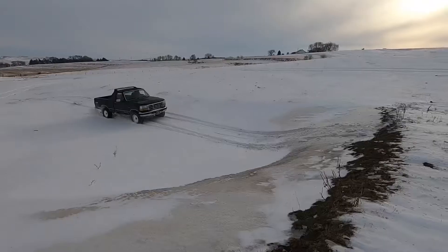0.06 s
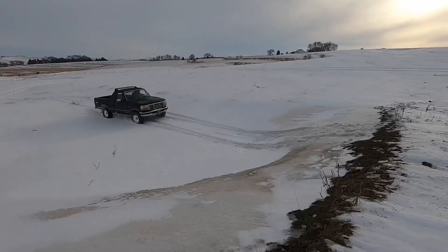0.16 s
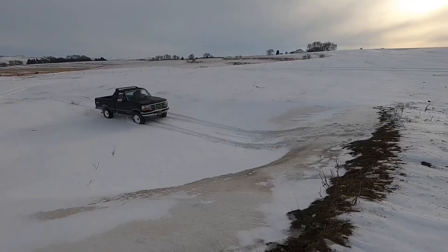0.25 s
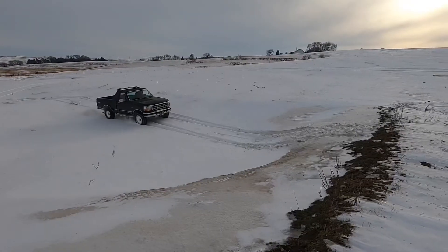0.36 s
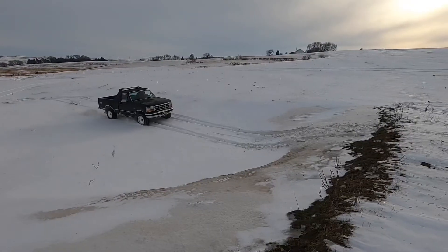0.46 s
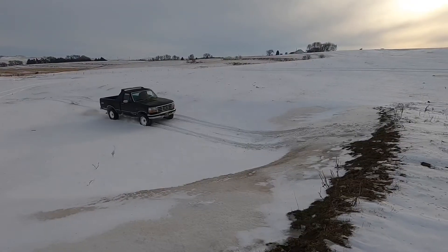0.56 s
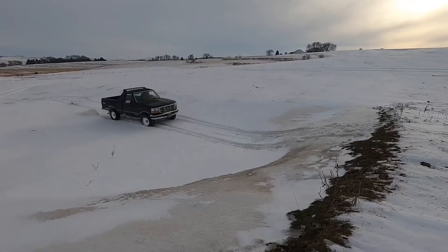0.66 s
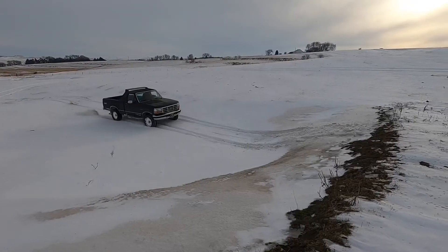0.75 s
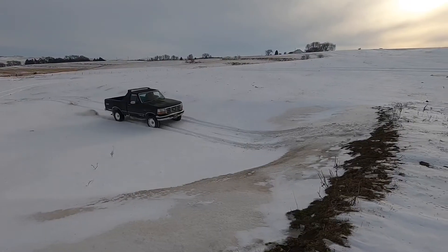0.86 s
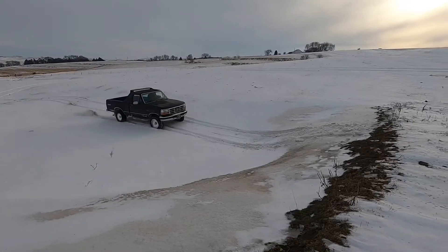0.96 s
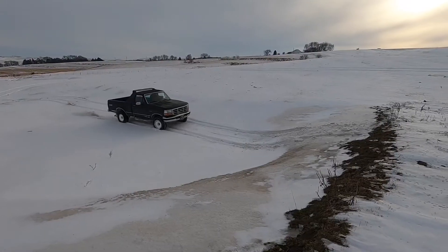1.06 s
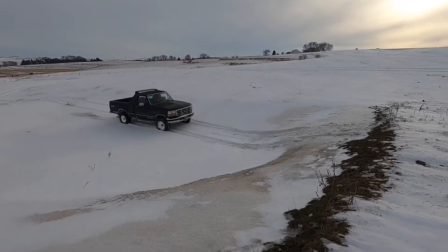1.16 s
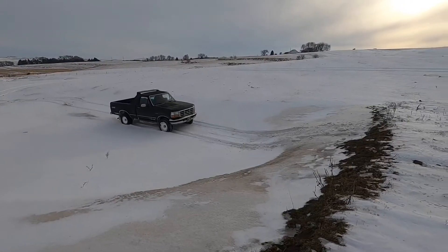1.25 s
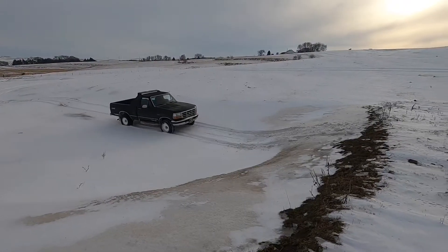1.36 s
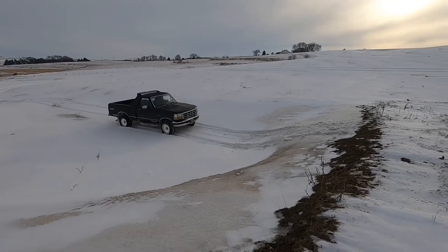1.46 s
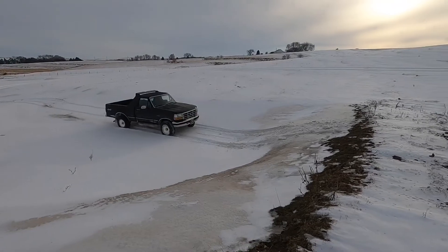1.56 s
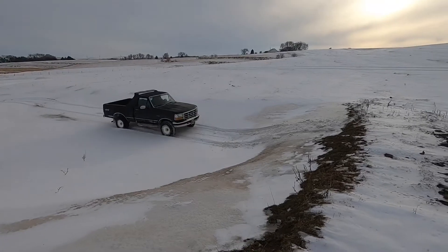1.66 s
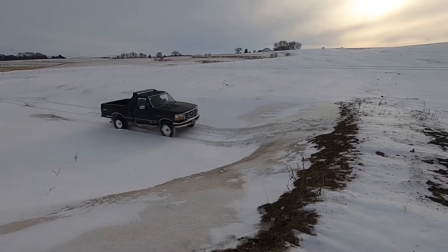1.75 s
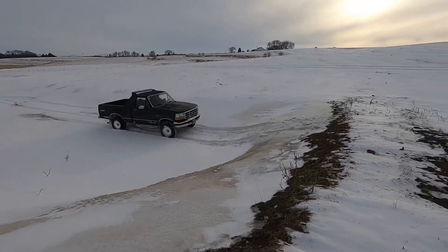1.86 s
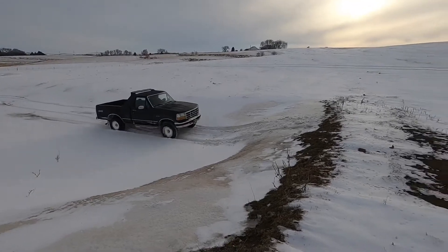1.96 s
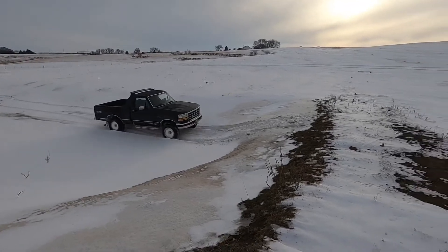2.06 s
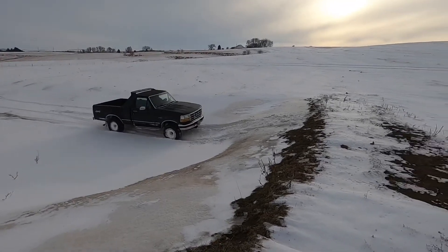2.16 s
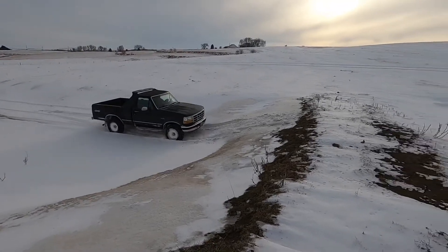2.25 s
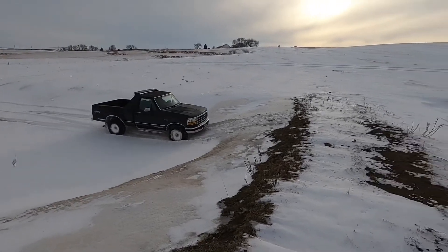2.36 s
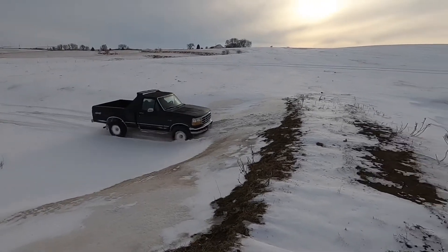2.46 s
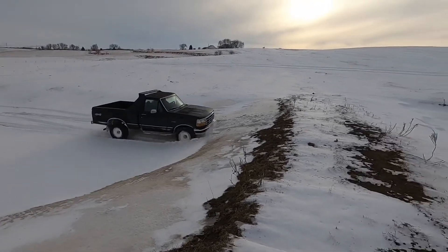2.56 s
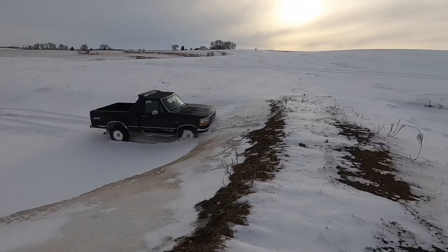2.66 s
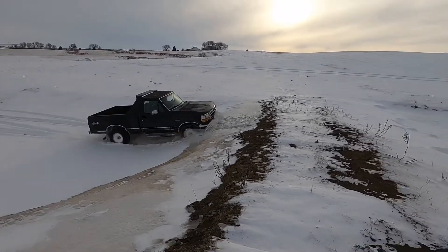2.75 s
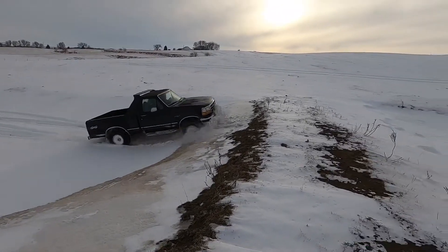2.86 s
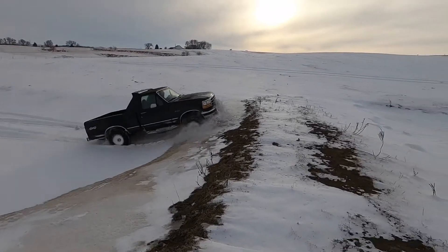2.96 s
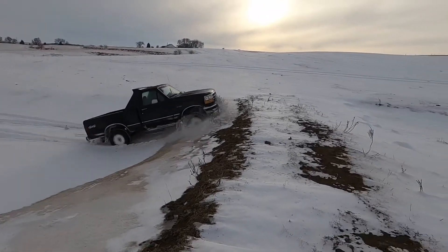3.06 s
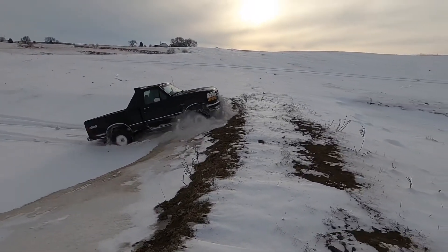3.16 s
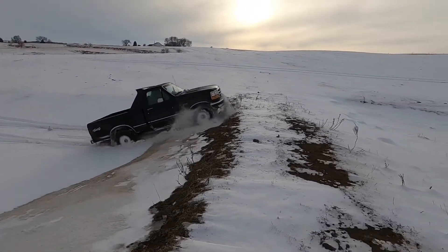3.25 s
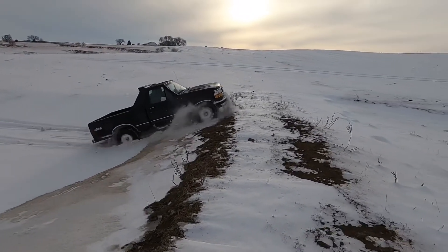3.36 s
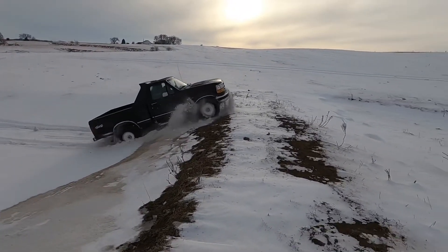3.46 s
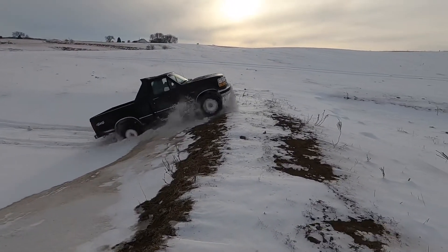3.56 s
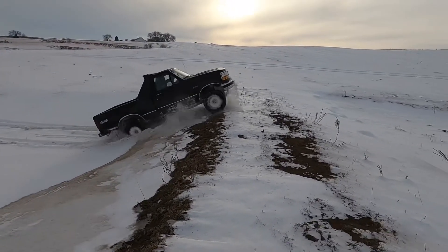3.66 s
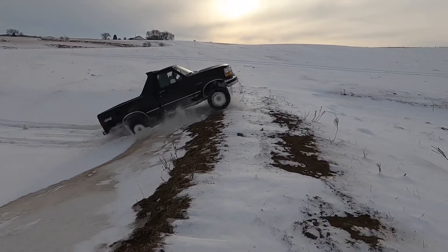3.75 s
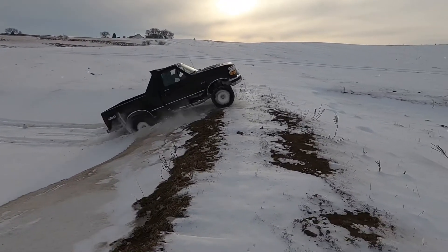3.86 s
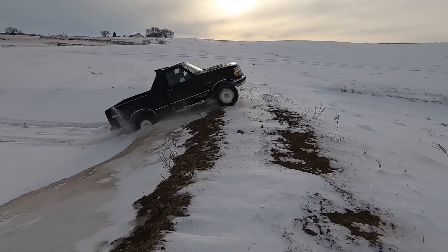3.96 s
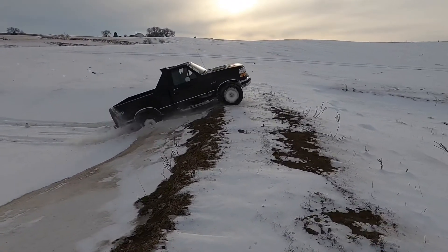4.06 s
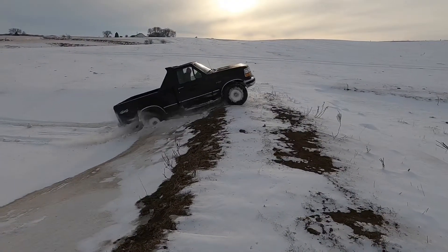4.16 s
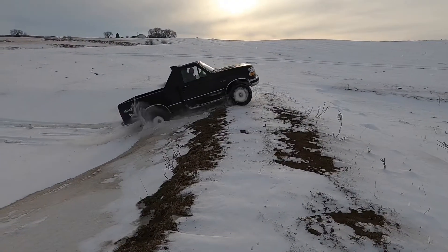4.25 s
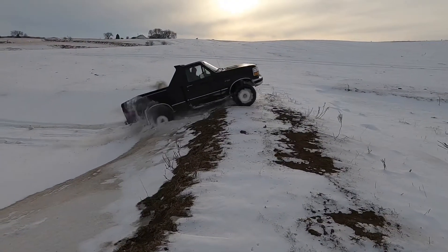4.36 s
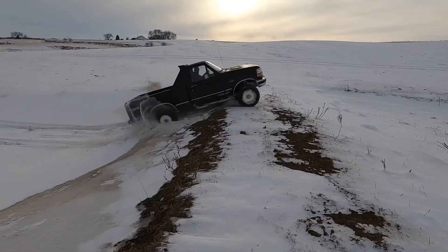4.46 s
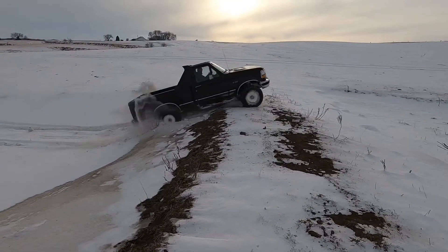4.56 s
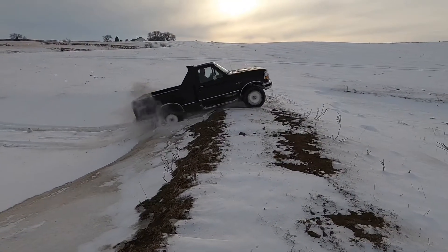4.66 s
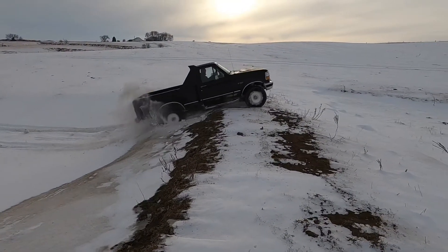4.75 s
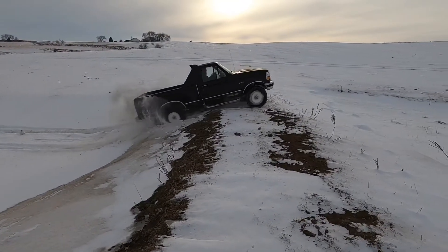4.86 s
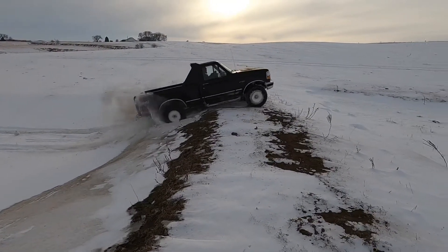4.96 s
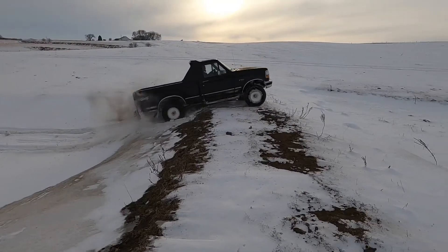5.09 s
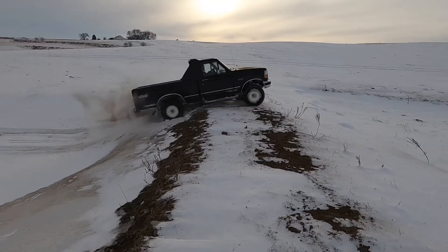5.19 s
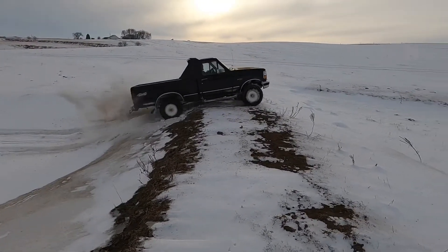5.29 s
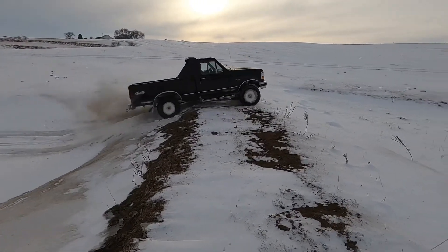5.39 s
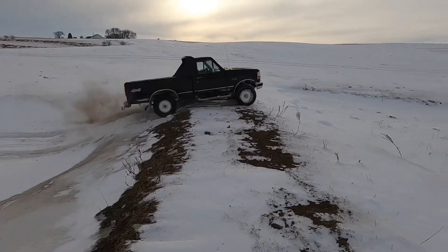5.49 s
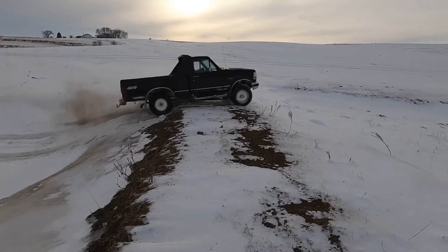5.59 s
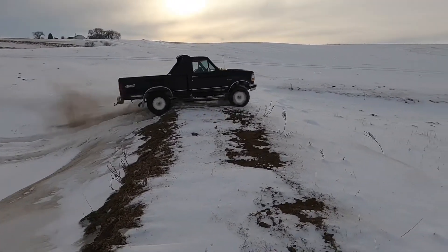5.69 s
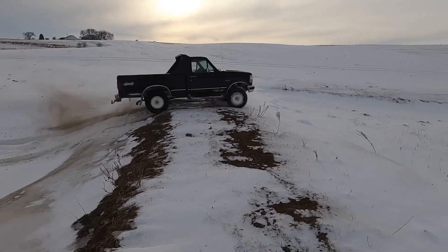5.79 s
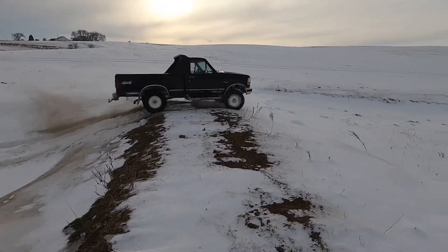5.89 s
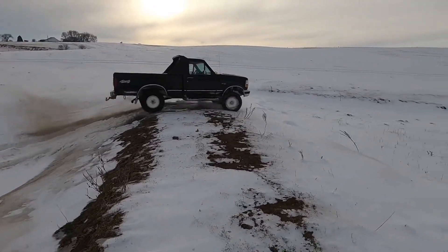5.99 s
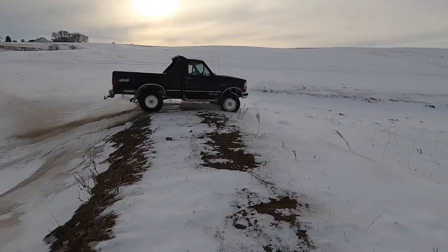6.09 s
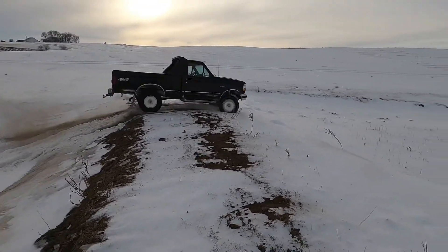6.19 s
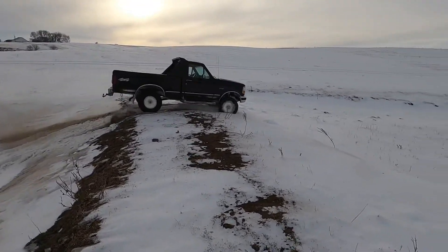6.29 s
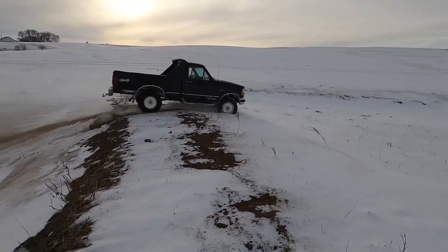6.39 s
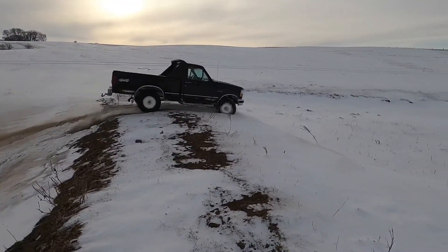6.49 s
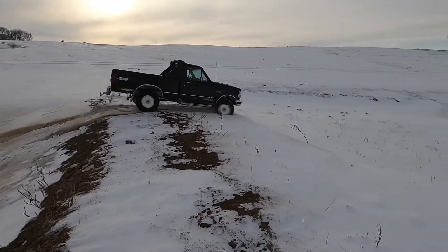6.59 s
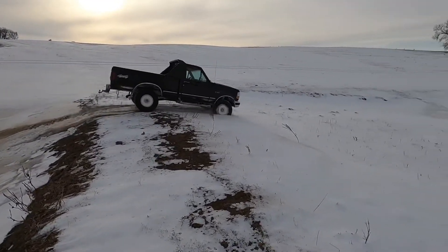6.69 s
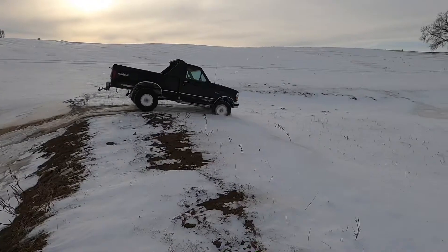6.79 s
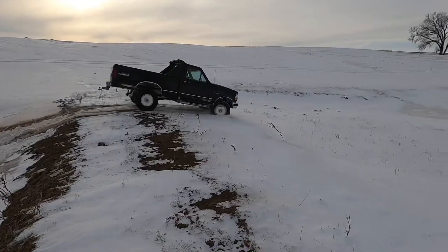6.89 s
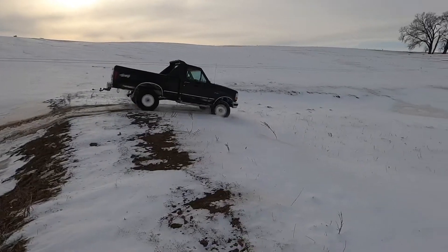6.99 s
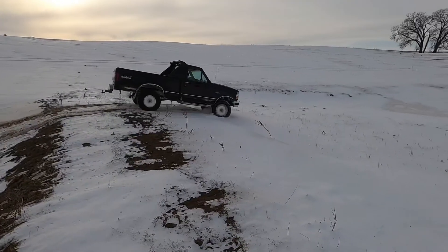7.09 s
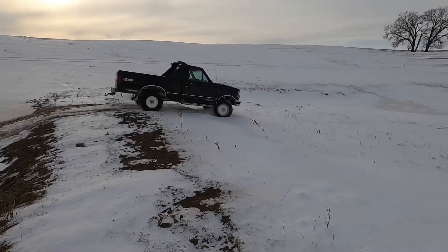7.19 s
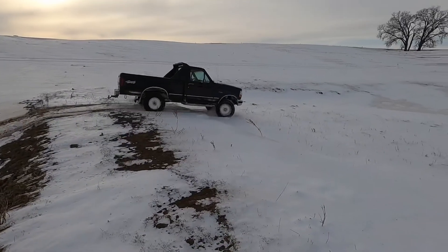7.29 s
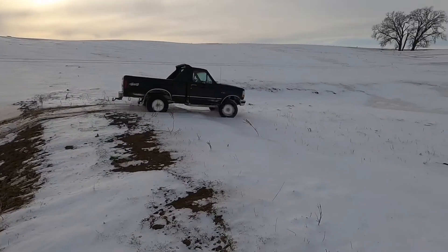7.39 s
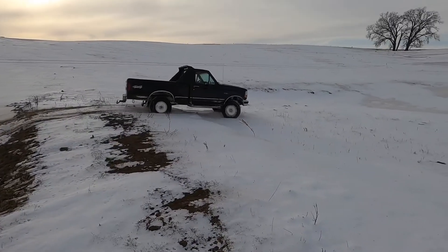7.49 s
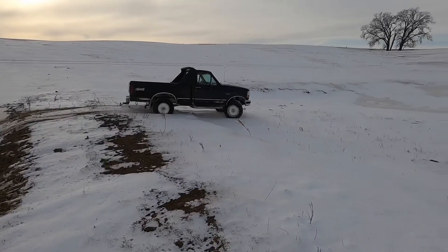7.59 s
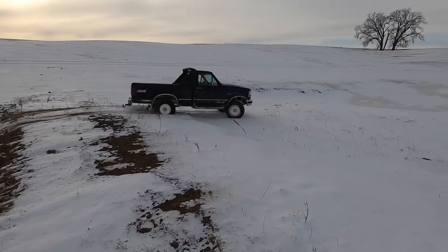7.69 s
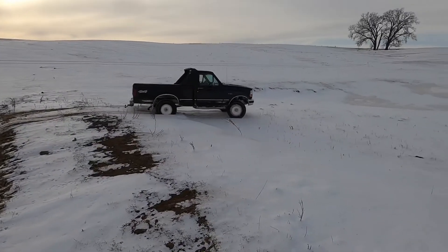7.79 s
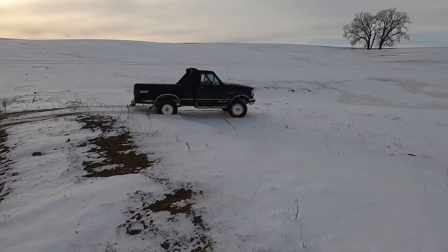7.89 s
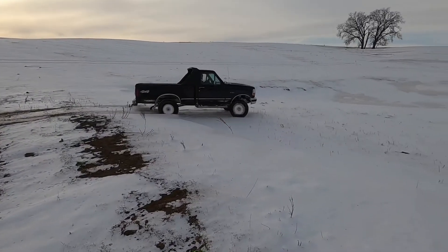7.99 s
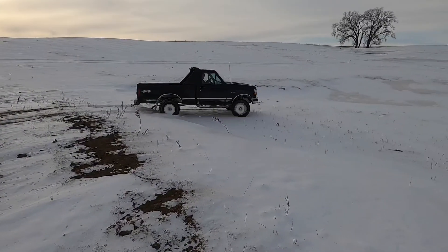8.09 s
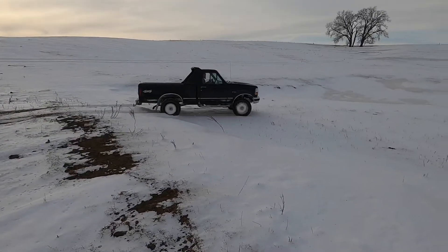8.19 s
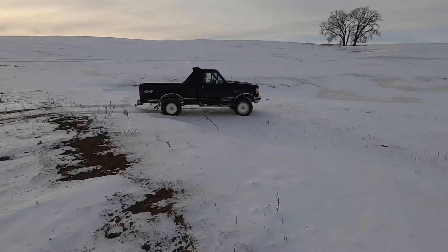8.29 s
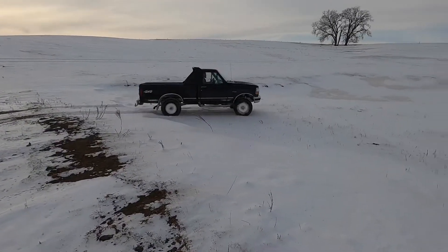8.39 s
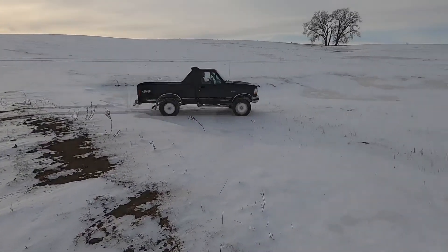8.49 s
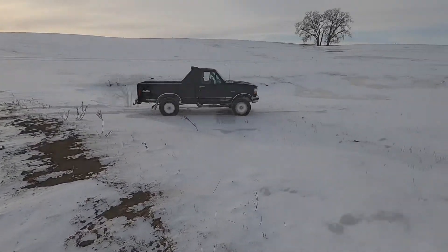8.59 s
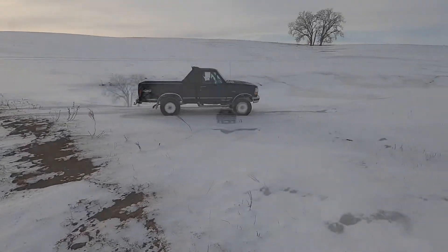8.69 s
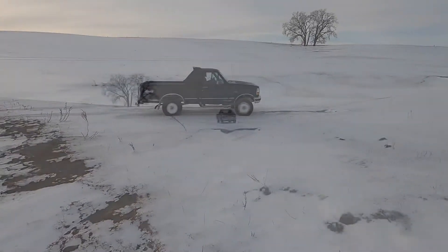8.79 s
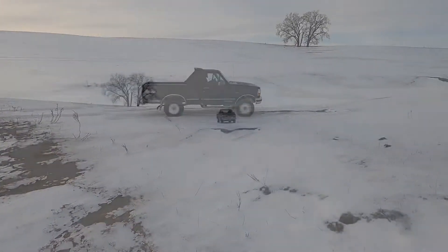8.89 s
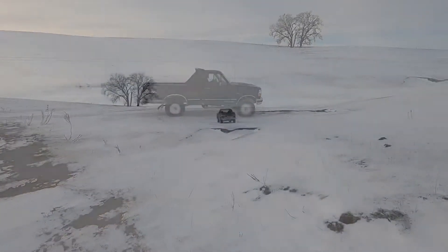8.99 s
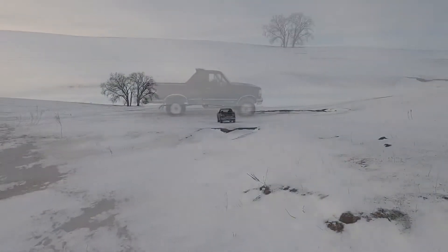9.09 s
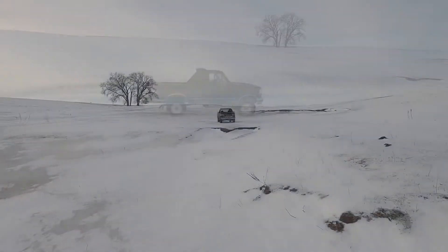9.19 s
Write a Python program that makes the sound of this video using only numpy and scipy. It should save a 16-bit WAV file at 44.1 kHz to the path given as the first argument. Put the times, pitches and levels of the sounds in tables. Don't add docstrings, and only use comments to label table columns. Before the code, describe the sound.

Outdoors on open snow, one nearly mono microphone hears a six-cylinder pickup already revving, its low exhaust hum barking under engine clatter, tyre churn, faint gear whine and light wind rumble. Small steel rattles tick at 0.1 to 0.4 seconds and around 1.1. Revs sag until 1.5, then surge with a jolt at 1.85. Near 2.7 to 3.3 the engine bogs and recovers as the truck lurches: thumps, sharp body clunks, bright rattles and rough wind-like shaking. From 3.8 to 5.3 it races hard, tyres spinning, snow hissing, casing ringing; a thump at 4.95 and a burst of churn at 5.3. Revs drop by 5.8, amid jingling steel, and the roar falls away after 6.3. A heavy thump hits at 6.67. Quiet low idle remains, with a small knock at 7.6, a gentle throttle swell near 8.4, a faint knock at 8.9 and a soft snow puff at 9.1.

```python
import sys
import numpy as np
from scipy import signal
from scipy.fft import rfft, irfft, next_fast_len
from scipy.io import wavfile
from scipy.ndimage import uniform_filter1d, map_coordinates

SR = 44100
rng = np.random.default_rng(int(sys.argv[2]) if len(sys.argv) > 2 else 0)


def amplitude_ratio(level_db):
    exponent = np.asarray(level_db, float) / 20
    return 10 ** exponent


def master(y):
    cut = np.clip(np.atleast_2d(y).T, -1, 1)
    pcm = np.round(cut * 32767)
    wavfile.write(sys.argv[1], SR, pcm.astype(np.int16))


N = 407484


def unit(x):
    return x / np.sqrt(np.mean(np.abs(x) ** 2) + 1e-20)


def seconds():
    return np.arange(N) / SR


def curves(rows):
    s, *cols = np.transpose(rows)
    return [np.interp(seconds(), s, c) for c in cols]


def bell(s, half):
    return np.exp(-((seconds() - s) / half) ** 2 / 2)


def wobble(rate):
    return map_coordinates(rng.standard_normal(int(N * rate / SR) + 4), [np.arange(N) * rate / SR])


def coloured(x, points):
    m = next_fast_len(N + 8192)
    hz, db = np.transpose(points)
    gain = amplitude_ratio(np.interp(np.log(np.fft.rfftfreq(m, 1 / SR) + 1), np.log(hz + 1), db))
    return unit(irfft(rfft(x, m) * gain, m)[:N])


def patchy(patchy_db):
    z = signal.stft(rng.standard_normal(N), nperseg=512)[2]
    field = uniform_filter1d(rng.standard_normal(z.shape), size=5, axis=0)
    field = uniform_filter1d(field, size=6, axis=1)
    return signal.istft(z * amplitude_ratio(patchy_db * unit(field)), nperseg=512)[1][:N]


def rings(rows, t60, attack, gain_db, crack=0):
    out = np.zeros(N + SR)
    t = np.arange(round(SR * np.clip(t60, .02, .2))) / SR
    shape = amplitude_ratio(gain_db - 60 * t / t60) * (1 - np.exp(-(t / attack) ** 2))
    for s, db, hz in rows:
        noise = 0
        if crack:
            noise = uniform_filter1d(rng.standard_normal(SR // 5), size=13)
            noise = 1.8 * uniform_filter1d(noise, size=9)[:len(t)]
        out[round(s * SR):][:len(t)] += amplitude_ratio(db) * shape * (np.sin(2 * np.pi * hz * t) + crack * noise)
    return out[:N]


def throttle():
    return np.interp(seconds(), [6.3, 6.6], [1, 0])


# start_s [s], firing_hz [Hz]
ENGINE_SPEED = [(0.0, 108.6), (0.44, 113.3), (0.85, 101), (1.5, 91.6), (1.85, 110.7), (2.15, 121.9),
                (2.81, 93.58), (3.3, 114), (3.57, 105.7), (3.86, 136), (4.07, 141.2), (4.37, 130.6),
                (4.65, 137.9), (4.94, 122), (5.3, 120.9), (5.8, 62), (6.15, 67), (6.8, 44.03)]


def firings():
    return np.cumsum(curves(ENGINE_SPEED)[0]) / SR


# start_s [s], spin [0-1]
WHEELSPIN = [
    (0, .1),
    (2.5, .1),
    (2.9, .9),
    (5.6, 1),
    (6.4, .6),
    (7.5, .1),
    (9.24, .1),
]


def wheelspin():
    return curves(WHEELSPIN)[0]


# start_s [s], half_length_s [s], low_end_db [dB up], metal_db [dB up]
JOLTS = [(0.092, 0.017, 0, 1), (1.84, 0.033, 8, -0.5), (2.623, 0.059, 2.5, -1.5), (2.712, .05, 1.5, 2.5),
         (2.956, 0.02, 3.5, 3), (3.027, 0.054, 6.5, 3), (3.263, 0.033, 4, 4), (4.155, .05, 2, -1.5),
         (4.606, 0.049, 1.5, 1.5), (5.378, .1, 4, 3.5), (6.193, .03, 3.5, -2.5)]


def jolts(metal=False):
    t = seconds()
    lift = 0
    for s, half, low_db, metal_db in JOLTS:
        shape = np.where(t < s, bell(s, 0.54 * half), bell(s, half))
        lift = lift + (metal_db if metal else low_db) * shape
    return lift


def beat(fired, cycle_db, firing_db, sharp):
    cycle = np.exp(sharp * (np.cos(2 * np.pi * (fired / 6 - .08)) - 1))
    return amplitude_ratio(cycle_db * cycle * (1.5 + 0.1 * wobble(18)) + firing_db * np.cos(2 * np.pi * fired))


# start_s [s], level_db [dB]
GUSTS = [(0, -27), (.28, -30), (1.1, -36), (1.9, -37), (2.55, -30.5), (2.9, -26.5), (3.05, -23),
         (3.32, -21.5), (3.63, -34.5), (4.2, -25), (4.81, -34), (5.4, -31), (6.02, -28), (6.4, -32),
         (6.87, -42.5), (7.6, -40), (8.6, -38), (9.24, -45)]
# pitch_hz [Hz], level_db [dB per Hz]
RUMBLE = [(10, -29), (25, -3), (45, -8), (70, -2), (110, -6.5), (200, -20.5), (400, -66), (800, -120)]


def wind():
    gust_db = curves(GUSTS)[0] + 1.94 + .5 * jolts()
    lumps = amplitude_ratio((0.3 + 0.98 * throttle()) * wobble(7))
    return amplitude_ratio(gust_db) * coloured(patchy(patchy_db=0.0) * lumps, RUMBLE)


# start_s [s], level_db [dB]
ROLLING = [
    (6.2, -34),
    (6.49, -53),
    (7.16, -53),
    (7.6, -53),
    (7.91, -51.5),
    (8.2, -51),
    (8.54, -53.5),
    (8.9, -56),
    (9.24, -59.5),
]
# pitch_hz [Hz], level_db [dB per Hz]
FAR = [(280, -41), (480, -6.5), (650, -2.5), (834, -11), (1080, -7.5), (1310, -17.5), (1640, -11),
       (2070, -17), (2380, -11.5), (3750, -26), (4080, -23), (5840, -27.5), (8590, -35), (10900, -43.5),
       (13000, -52)]
# start_s [s], half_length_s [s], level_db [dB]
SWISH = (9.125, 0.032, -57)
# start_s [s], half_length_s [s], level_db [dB]
BLIP = (8.43, 0.45, 12.1)


def coasting(fired):
    rolling = patchy(patchy_db=2.0) * beat(fired, cycle_db=-0.5, firing_db=1.0, sharp=3.4)
    rolling = coloured(rolling, FAR + [(15000, -97)])
    rolling = np.sqrt(1 - throttle() ** 2) * amplitude_ratio(curves(ROLLING)[0] + 0.5) * rolling
    s, half, db = SWISH
    hiss = [(800, -42), (2000, -2), (6000, -6), (9000, -13), (13000, -30)]  # Hz, dB per Hz
    puff = amplitude_ratio(db) * bell(s, half) * coloured(rng.standard_normal(N), hiss)
    drone = bell(BLIP[0] - .1, BLIP[1]) * coloured(patchy(patchy_db=2.0), CHURN)
    return rolling + puff + amplitude_ratio(-53.5) * drone


def thuds(rows, half, lead):
    out = 0
    tail_db, tail_t60 = -9, .2
    for s, db, hz in rows:
        t = seconds() - s - lead
        swell = np.exp(1.9 - 1.95 * np.sqrt(1 + (t / half) ** 2))
        tail = amplitude_ratio(tail_db - 60 * np.abs(t) / tail_t60) * np.clip(t / half, 0, 1) * wobble(60)
        out = out + amplitude_ratio(db) * (swell + tail) * np.cos(2 * np.pi * hz * t + 1.7)
    return out


# start_s [s], peak_db [dB], pitch_hz [Hz]
THUMPS = [
    (2.689, -23, 167),
    (2.94, -18, 151),
    (4.949, -17, 198),
    (6.669, -11, 213),
    (6.670, -20, 119),
    (6.699, -27, 210),
]
# start_s [s], peak_db [dB], pitch_hz [Hz]
CLUNKS = [(1.849, -21, 630), (2.937, -12, 790), (2.999, -29, 727), (3.039, -31.5, 700), (3.238, -15, 689),
          (3.271, -8.5, 690), (5.752, -20, 670), (6.672, -30, 1050), (6.673, -26, 448), (7.615, -25.5, 896),
          (7.665, -33, 625), (8.896, -31, 599)]
# start_s [s], peak_db [dB], pitch_hz [Hz]
RATTLES = [(0.1071, -18, 4000), (0.2423, -20, 3720), (0.3576, -24, 3690), (1.0733, -15.5, 2710),
           (1.1228, -22, 2730), (2.1166, -15, 2710), (2.6913, -20, 2780), (2.7394, -15, 3390),
           (2.7786, -11, 2700), (2.963, -12, 2670), (3.025, -22, 2650), (3.1491, -16, 2650),
           (3.2057, -15, 2620), (3.3628, -24, 2742), (3.589, -14.5, 2664), (4.8923, -19, 2726),
           (5.3358, -16, 2412), (5.8004, -20, 2590), (5.879, -15, 2549), (5.9337, -14, 2597),
           (5.9971, -12.5, 2410), (6.087, -16, 2614), (6.1746, -16, 2490), (6.181, -22, 3900),
           (6.196, -24, 3880), (7.6131, -40, 2460)]


def chassis():
    thumps = thuds(THUMPS, half=0.0036, lead=0.0052)
    clunks = rings(CLUNKS, t60=0.027, attack=0.0018, gain_db=-4.5, crack=0.91)
    rattles = rings(RATTLES, t60=0.051, attack=0.0028, gain_db=-11.5)
    return thumps + clunks + rattles


# pitch_hz [Hz], level_db [dB]
WHINES = [
    (957, -49.5),
    (746, -54.5),
    (1059, -54.5),
]


def gears():
    out = 0
    for hz, db in WHINES:
        level_db = db - 14 * wheelspin() + 3 * wobble(5)
        out = out + np.sqrt(2) * amplitude_ratio(level_db) * np.sin(2 * np.pi * hz * seconds() + 1.3 * wobble(45))
    return out * throttle()


# start_s [s], pitch_hz [Hz], facing_us_db [dB]
CASING = [(0.0, 2640, -8), (1.1, 2800, 5), (1.8, 2523, -2), (2.9, 2698, 1), (3.66, 2505, -0.5),
          (4.61, 2580, 3.5), (5.3, 2430, 2.5), (6.0, 2497, 2), (6.6, 2460, 1)]


def casing(fired):
    hz, facing_db = curves(CASING)
    db = facing_db + curves(EFFORT)[0] - 15 + 14.5 * wheelspin() + 2.9 * wobble(6.6)
    shake = unit(wobble(250) + 1j * wobble(250))
    shake = shake * beat(fired, cycle_db=2.0, firing_db=1.5, sharp=3.3)
    ring = np.real(shake * np.exp(2j * np.pi * np.cumsum(hz) / SR))
    return throttle() * amplitude_ratio(db - 6) * ring


def pings(count, low_hz, high_hz, t60):
    when, pitch, size = rng.random((count, 3)).T
    rows = np.transpose([when * N / SR, 8 * size, low_hz * (high_hz / low_hz) ** pitch])
    return unit(rings(rows, t60, attack=.006, gain_db=0))


# start_s [s], level_db [dB]
TYRES = [(0, -36.5), (.15, -38), (1.1, -40), (1.7, -38), (2.3, -39.5), (2.85, -38.5), (3.05, -35.5),
         (3.55, -39.5), (4.18, -35), (4.76, -36.5), (5.32, -29.5), (5.65, -37), (6.15, -40), (6.5, -59)]
# start_s [s], level_db [dB]
EFFORT = [(0, -37), (.5, -40.5), (.97, -41), (1.45, -39.5), (1.7, -35.5), (2.05, -37.5), (2.27, -41),
          (2.65, -39.5), (3.0, -36.5), (3.53, -39), (3.72, -36), (4.6, -37), (5.3, -39.5), (5.55, -48.5),
          (5.76, -46), (5.9, -39), (6.18, -39), (6.5, -69)]
# pitch_hz [Hz], level_db [dB per Hz]
CHURN = [(290, -30), (500, -6.5), (674, 0.5), (846, -4), (1050, -3), (1290, -6.5), (1460, -20.5),
         (1550, -16.5), (2020, -38.5), (3410, -120)]
# pitch_hz [Hz], level_db [dB per Hz]
CLATTER = [(850, -32.5), (1450, -4.5), (1520, -12), (1660, 2), (1790, 4.5), (2160, 2.5), (2630, 2.5),
           (2990, -0.5), (3600, -15.5), (4680, -15), (7920, -120)]
# pitch_hz [Hz], level_db [dB per Hz]
SPRAY = [(1880, -24), (3200, -0.5), (3830, -3), (4830, -4.5), (5300, -8), (6730, -11), (7380, -17),
         (9010, -13), (11100, -29), (12400, -27), (14900, -36), (15600, -45.5)]


def roar(fired):
    churn_db = curves(TYRES)[0] + 0.69 * jolts()
    clatter_db = curves(EFFORT)[0] + jolts(metal=True)
    spray_db = clatter_db - 9 - 2 * bell(5.4, 0.14)
    flutter = 0.34 * wobble(9.8) + 0.72 * wobble(35)

    churn = patchy(patchy_db=-0.5) * beat(fired, cycle_db=1.0, firing_db=-1.0, sharp=3.)
    churn = coloured(churn * amplitude_ratio(0.67 * flutter), CHURN)
    churn = churn + 0.92 * bell(5.467, 0.56) * (uniform_filter1d(churn, size=25) - churn)

    clatter = patchy(patchy_db=1.0) * beat(fired, cycle_db=2, firing_db=1.5, sharp=4.)
    clatter = clatter * amplitude_ratio(0.73 * flutter)
    clatter = coloured(clatter + .13 * pings(count=900, low_hz=1570, high_hz=3600, t60=0.089), CLATTER)

    spray = patchy(patchy_db=0.67) * beat(fired, cycle_db=3.0, firing_db=1.5, sharp=2.0)
    spray = spray * amplitude_ratio(0.21 * flutter)
    spray = coloured(spray + .3 * pings(count=1200, low_hz=3300, high_hz=12840, t60=0.053), SPRAY)
    fizz_db = 0.0721 * np.maximum(curves(ENGINE_SPEED)[0] - 110, 0)
    spray = spray + (amplitude_ratio(fizz_db) - 1) * (spray - uniform_filter1d(spray, size=5))

    mix = amplitude_ratio(churn_db - 0.4) * churn + amplitude_ratio(clatter_db - 2.1) * clatter + amplitude_ratio(spray_db + 1.03) * spray
    return throttle() * mix


CYLINDERS = [0.5, 1.5, 3.5, -9.5, 5, -10.5]


def puffs(fired, scatter_db):
    at = np.flatnonzero(np.diff(np.floor(fired)))
    out = np.zeros(N)
    out[at] = amplitude_ratio(np.resize(CYLINDERS, len(at)) + scatter_db * rng.standard_normal(len(at)))
    return out - np.interp(np.arange(N), at, out[at]) * np.gradient(fired)


# start_s [s], level_db [dB]
GAS_FLOW = [(0.0, -29), (0.44, -34), (0.85, -30.5), (1.46, -26.5), (1.75, -20.5), (2.24, -29.5),
            (2.49, -26), (3.0, -38), (3.22, -20), (3.55, -28.5), (3.78, -21.5), (4.1, -26.5), (4.45, -22.5),
            (4.68, -22.5), (5.3, -24.5), (5.6, -29), (6.05, -23), (6.7, -48.5)]
# pitch_hz [Hz], level_db [dB]
PIPE = [(20, -35), (60, -17.5), (120, -1), (200, -1.5), (260, -2), (330, -18), (600, -44.5), (1500, -53.5),
        (3000, -120)]
# pitch_hz [Hz], level_db [dB]
TAILPIPE = [(150, -120), (260, 0.5), (400, 9), (700, 1), (1100, -12.5), (1500, -28), (2500, -120)]
# pitch_hz [Hz], level_db [dB per Hz]
BODY = [(200, -55.5), (300, 1.5), (350, 0), (430, -1.5), (500, -6.5), (620, -50), (900, -120)]


def bark(fired):
    slip, idle_db, pedal = wheelspin(), curves(ROLLING)[0], throttle()
    bark_db = -40.5 + 0.24 * (curves(GAS_FLOW)[0] + 28) + 13.5 * slip + 1.8 * jolts()
    bark_db = pedal * bark_db + (1 - pedal) * (idle_db + 5)
    boom_db = curves(TYRES)[0] - 5 + 1.4 * jolts()
    boom_db = pedal * boom_db + (1 - pedal) * (idle_db - 4.5) + 3 * wobble(5)

    gas = patchy(patchy_db=0.5) * (1 + 0.15 * np.cos(2 * np.pi * fired))
    pipe = unit(.45 * coloured(puffs(fired, scatter_db=3), PIPE) + .9 * coloured(gas, PIPE))
    rasp = amplitude_ratio(-3 - 14 * slip) * coloured(puffs(fired, scatter_db=1.5), TAILPIPE)
    boom = coloured(patchy(patchy_db=-0.5) * (1 + 0.37 * np.cos(2 * np.pi * fired)), BODY)
    return amplitude_ratio(bark_db - 1.0) * pipe + amplitude_ratio(boom_db - 1.0) * (boom + rasp)


ORDERS = [3 / 6, 5 / 6, 6 / 6, 9 / 6, 10 / 6, 12 / 6, 18 / 6, 24 / 6, 30 / 6]
# over_gas_flow_db [dB], share_of_flow_swings [ratio], wheelspin_gain_db [dB], idle_gain_db [dB]
ORDER_LEVELS = [(-6.5, 0.58, -9, -9), (-10.5, 0.065, 10, -15), (3.9, 1, -4.6, -0.8),
                (-25.5, 0.14, 11.5, 13), (-25, 0.27, 19, 3), (-14.5, 0.92, 10, 12.5),
                (-13.5, 0.096, 5.5, 3.5), (-9, -0.1, -6.5, -1.5), (-14, -0.21, -8.5, -6)]
# pitch_hz [Hz], level_db [dB]
MUFFLER = [(40, -3.8), (65, -5), (100, -0.5), (118, 0), (145, -2.5), (210, 1.5), (290, -10), (400, -14)]


def tones(fired):
    firing_hz, slip, idle = curves(ENGINE_SPEED)[0], wheelspin(), 1 - throttle()
    flow_db = curves(GAS_FLOW)[0] + BLIP[2] * bell(*BLIP[:2])
    muffler_hz, muffler_db = np.transpose(MUFFLER)
    hum = 0
    for order, (db, share, spin_db, idle_db) in zip(ORDERS, ORDER_LEVELS):
        level_db = -26 + (share + idle * (1 - share)) * (flow_db + 26)
        level_db = level_db + db + spin_db * slip + idle_db * idle
        level_db = level_db + np.interp(order * firing_hz, muffler_hz, muffler_db)
        level_db = level_db + (1.2 if order == 1 else 2.5 - 1.5 * idle) * wobble(6.5)
        if abs(order - 5 / 6) < .01:
            level_db = level_db + .2 * slip * (firing_hz - 130)
        shake = (.1 + .13 * order + .16 * slip * min(order, 2) ** 2) * wobble(25)
        hum = hum + np.sqrt(2) * amplitude_ratio(level_db) * np.sin(2 * np.pi * order * fired + shake)
    return hum


def scene():
    fired = firings()
    mono = wind() + coasting(fired) + chassis() + gears()
    mono = mono + casing(fired) + roar(fired) + bark(fired) + tones(fired)
    return np.array([mono, mono])


def roll_off(x):
    return signal.sosfilt(signal.butter(12, 15770, fs=SR, output="sos"), x)


# start_s [s], half_length_s [s], level_db [dB under the sound]
WIDE = [
    (3.422, 0.28, -20),
    (9.22, 0.019, -27),
]
# pitch_hz [Hz], level_db [dB per Hz]
EDGE = [(300, -120), (500, -5.5), (2000, -10.5), (8000, -15), (10500, -18), (12000, -2), (14500, -2.5),
        (15700, -23), (17000, -120)]


def record(dry):
    held = dry / (1 + np.abs(dry / .55) ** 4) ** (1 / 4)
    width = amplitude_ratio(-51) + sum(amplitude_ratio(db) * bell(s, half) ** 2 for s, half, db in WIDE)
    flutter = width * wobble(40) * uniform_filter1d(held[0], size=7)
    fizz_db = curves(EFFORT)[0] - 34.0 + 14 * (1 - throttle())
    apart = flutter + amplitude_ratio(fizz_db) * coloured(rng.standard_normal(N), EDGE)
    return roll_off(held + [apart, -apart])


dry = scene()
out = record(dry)
master(out)
```